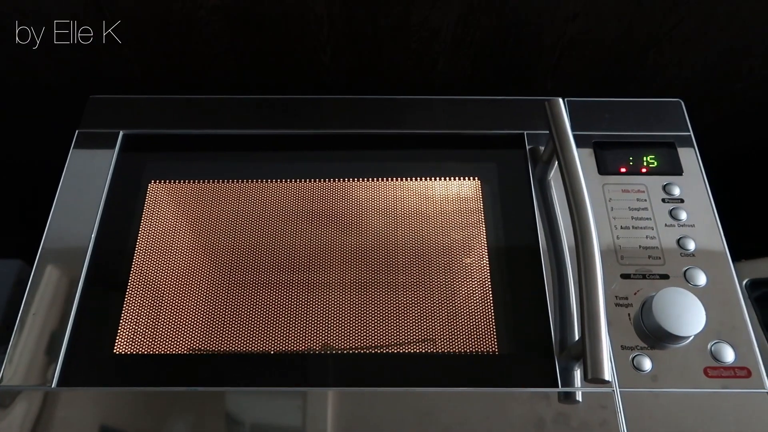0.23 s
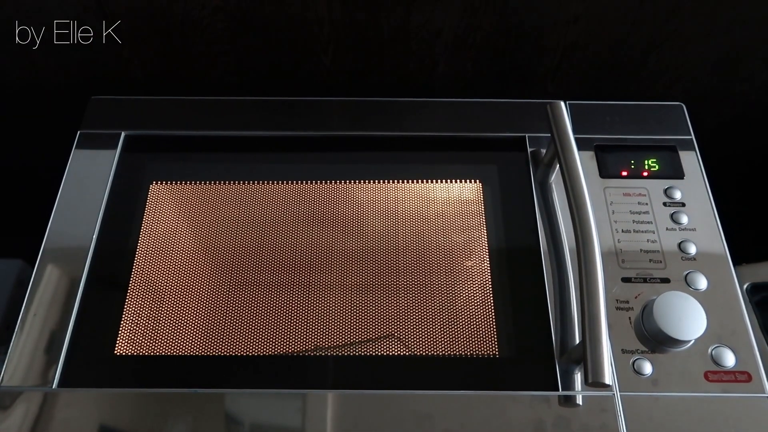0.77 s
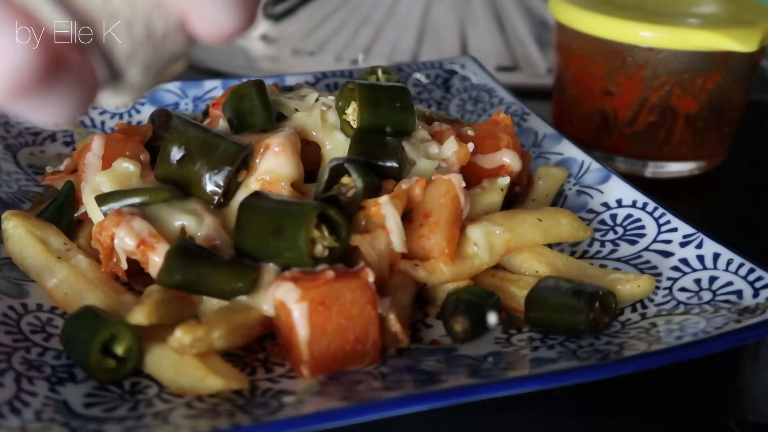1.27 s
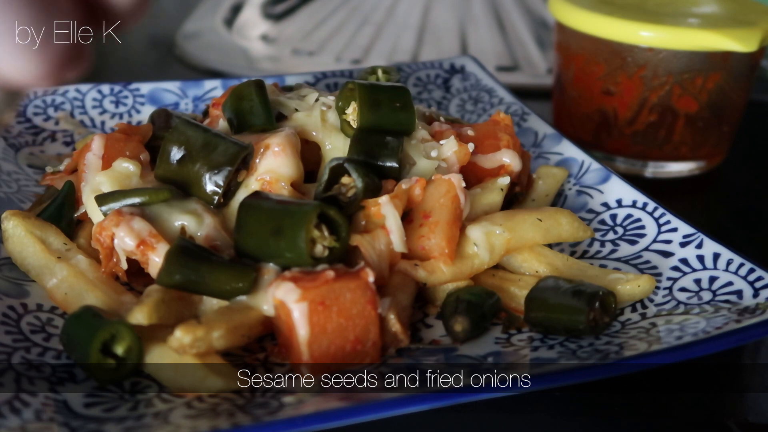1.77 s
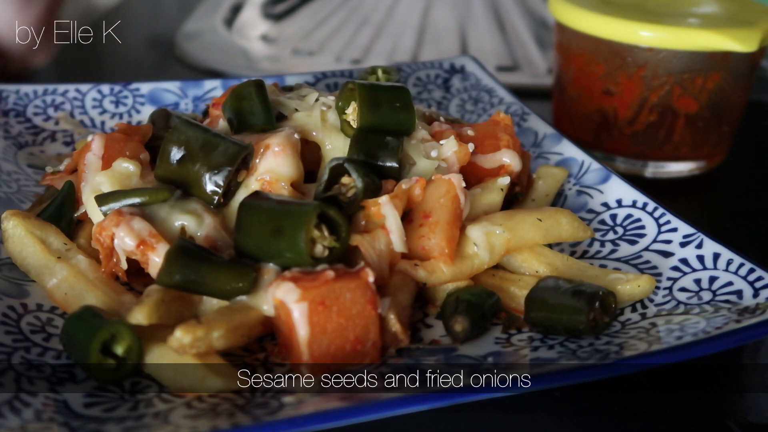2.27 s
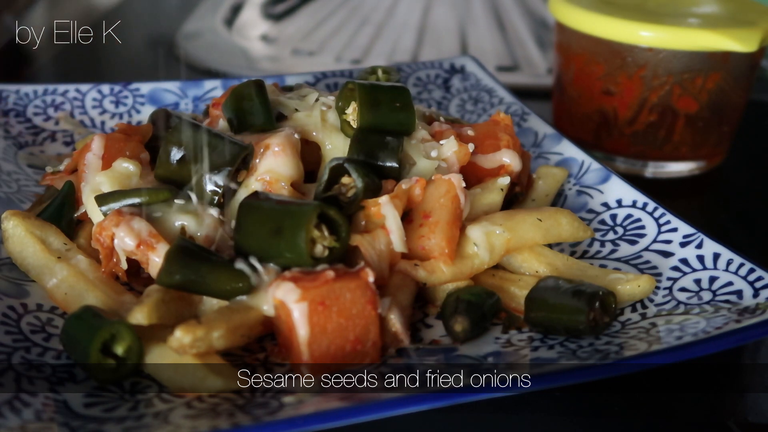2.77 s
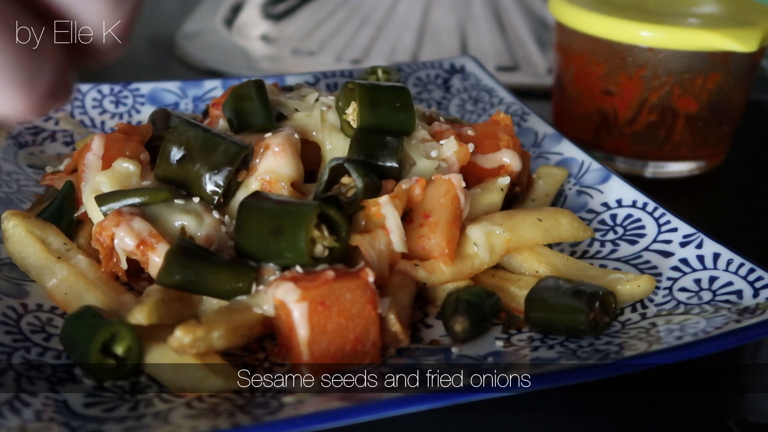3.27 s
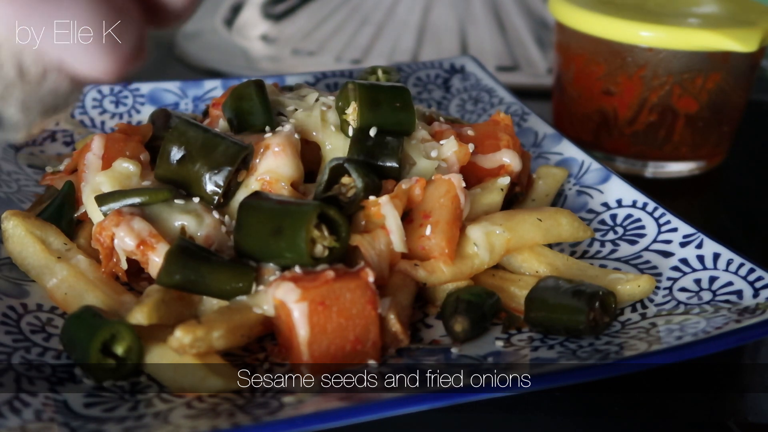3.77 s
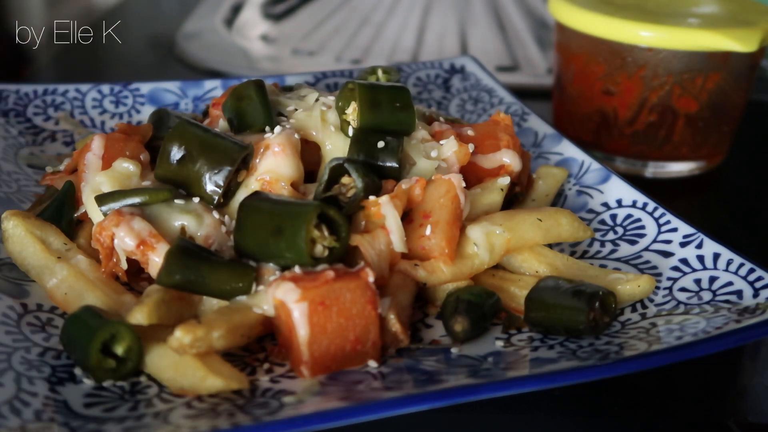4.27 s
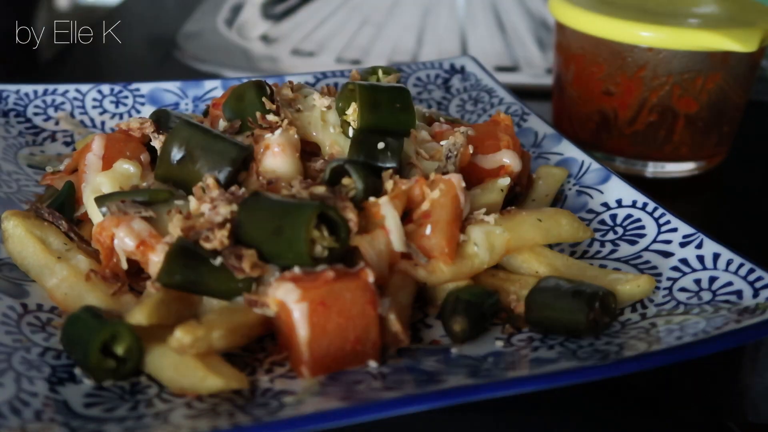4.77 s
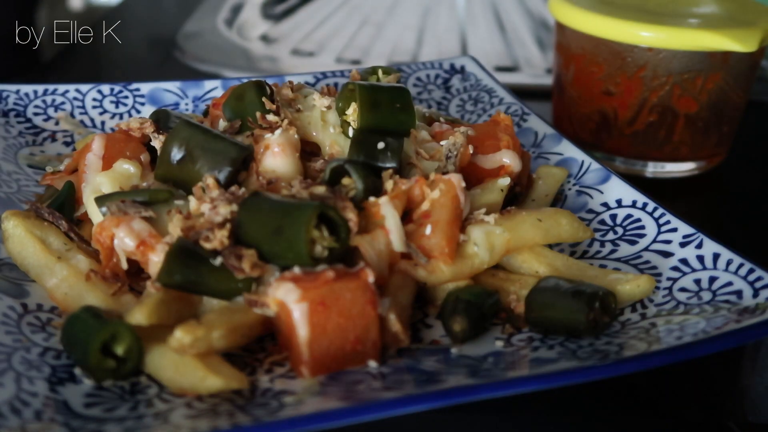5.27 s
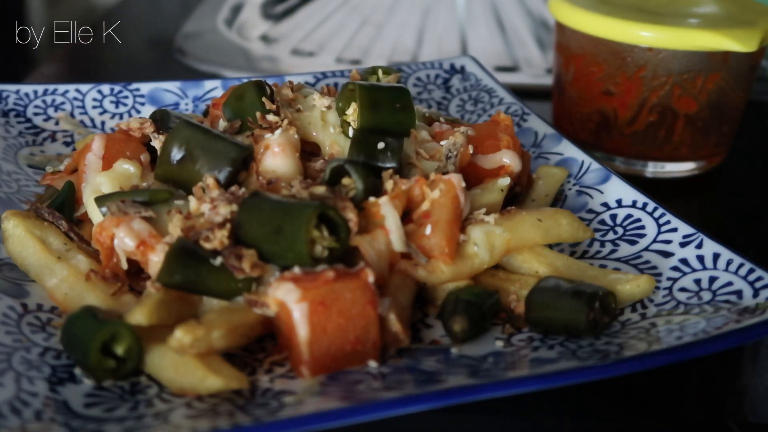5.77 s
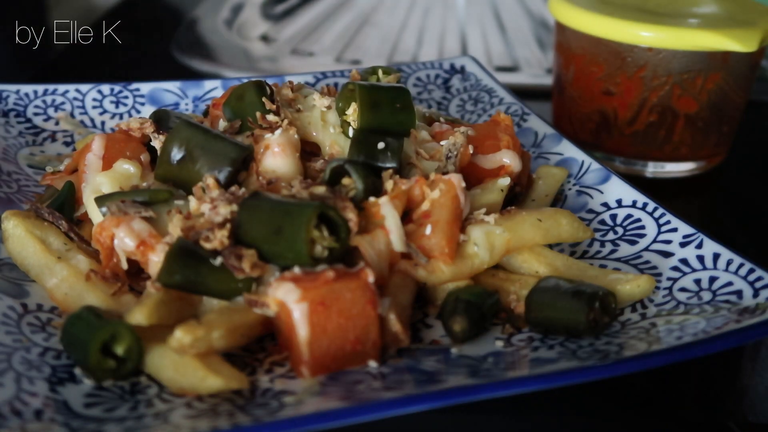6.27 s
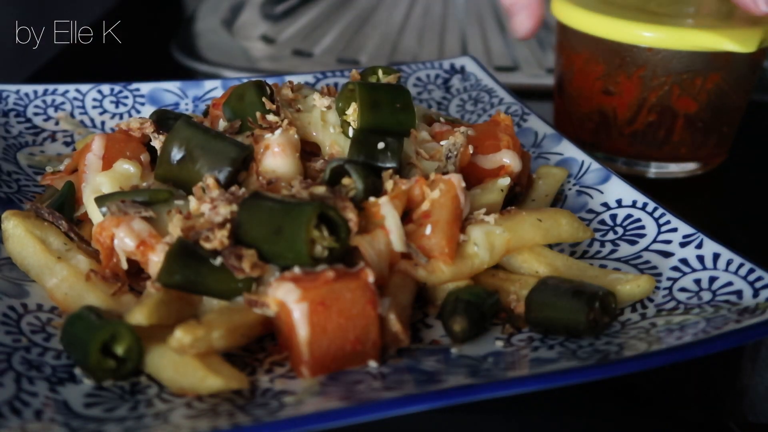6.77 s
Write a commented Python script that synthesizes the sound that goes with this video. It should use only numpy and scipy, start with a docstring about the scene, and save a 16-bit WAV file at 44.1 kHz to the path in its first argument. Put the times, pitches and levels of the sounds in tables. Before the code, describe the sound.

Microwave drone stops dead, faint seeds tick from a tapped jar onto food, a hard tap releases a loud crunchy pour, then rustling and a tiny clink.

```python
"""A microwave oven hums close by and is cut off; then, in the quiet kitchen, a shaker is tapped and seeds
rattle in it and patter on the food. After a tap, a handful of crisp bits pours over a plate in surges, hands
rustle, a tub is knocked and a glass clinks. Hums are sines and airy sounds are shaped noise; seeds and bits are
random clicks ringing resonances; knocks are sets of dying tones."""
import sys
import numpy as np
from scipy import signal
from scipy.fft import rfft, irfft, next_fast_len
from scipy.io import wavfile

SR = 44100
rng = np.random.default_rng(int(sys.argv[2]) if len(sys.argv) > 2 else 0)


def master_out(mix):
    """Clip the mix to full scale and print it as 16-bit PCM to the path in sys.argv[1]."""
    frames = np.transpose(np.atleast_2d(mix))
    ceiling = np.clip(frames, -1, 1)
    pcm = np.round(ceiling * 32767).astype(np.int16)
    wavfile.write(sys.argv[1], SR, pcm)


N = 310023
TIME = np.arange(N) / SR   # seconds
OVEN_STOP_S = 1.1

# The hard tap before the pour. Each row: start in seconds, strength in dB.
TAP_HITS = [(4.7235, -31)]
# Short bursts of crackle: clumps of bits landing, then from 5.95 s rustles of the moving hands.
# Each row: start in seconds, level in dB, time to fade by 60 dB in seconds, ringing pitch in Hz,
# treble in dB against the level.
CRACKLE_BURSTS = [(4.872, -37, 0.08, 1850, -18), (4.884, -31, 0.14, 1900, -6.5),
                  (4.926, -30, 0.1, 2340, -4), (4.942, -28, 0.084, 2470, -4),
                  (4.9847, -18.5, 0.055, 2480, 1), (5.001, -20, .1, 5660, 1.5),
                  (5.016, -18.5, 0.11, 2300, 2.5), (5.173, -34, 0.04, 2870, -6), (5.215, -21, 0.1, 5640, 4),
                  (5.311, -17, 0.085, 5180, 3.5), (5.343, -18, 0.16, 2040, 2),
                  (5.398, -16.5, 0.16, 1295, -8), (5.439, -14.5, 0.075, 1400, -15),
                  (5.508, -16, 0.11, 2970, -1), (5.527, -11.5, 0.072, 2320, -12),
                  (5.582, -20.5, 0.099, 2890, -10), (5.621, -15.5, 0.14, 3010, 0),
                  (5.643, -11.5, 0.069, 937, 0.5), (5.668, -23, .08, 5750, -1), (5.692, -24, .09, 5640, -5),
                  (5.723, -25, 0.089, 2980, -3), (5.76, -28, .08, 2950, -6), (5.956, -50, 0.073, 805, -19),
                  (6.047, -38, 0.2, 1620, -34.5), (6.066, -36, .12, 3100, -30),
                  (6.1, -40.5, .08, 1350, -17), (6.154, -40, 0.099, 1030, -5), (6.269, -48, 0.12, 950, -22),
                  (6.3, -47, .08, 1050, -22), (6.459, -49.5, 0.29, 1750, -25.5),
                  (6.502, -47.5, 0.15, 1740, -28)]
# Hands and bag moving. Each row: time in seconds, level in dB.
HAND_LEVELS = [(5.75, -49.5), (6.03, -44.5), (6.06, -41), (6.215, -43), (6.24, -51), (6.31, -45),
               (6.34, -53), (6.445, -60), (6.47, -49.5), (6.57, -49.5), (6.6, -56), (6.81, -57.5),
               (6.822, -49.5), (6.88, -59.5), (7.03, -56)]


def from_db(db):
    """Turn dB into gain."""
    return 10 ** (np.asarray(db) / 20)


def rms_one(x):
    """Scale to an rms (average strength) of 1."""
    return x / np.sqrt(np.mean(x ** 2) + 1e-20)


def in_time(rows):
    """Draw straight lines between the rows of a level table: one level for each sample."""
    s, level = np.transpose(rows)
    return np.interp(TIME, s, level)


def at_hz(points, hz):
    """Read a table of values against frequency, on a log-frequency axis."""
    table = np.array(points)
    return np.interp(np.log(hz), np.log(table[:, 0]), table[:, 1])


def drift(rate_hz):
    """Slow random wander around zero with rms 1, made at a fortieth of the sample rate."""
    r = np.exp(-2 * np.pi * rate_hz * 40 / SR)
    noise = rng.standard_normal(N // 40 + 2002)
    slow = signal.lfilter([1], [1, -2 * r, r * r], noise)[2000:]   # drop the filter's start-up
    return np.interp(np.arange(N) / 40, np.arange(len(slow)), rms_one(slow))


def fft_grid():
    """A fast transform size and the frequency of each of its bins."""
    size = next_fast_len(N)
    return size, np.maximum(np.arange(size // 2 + 1) * SR / size, 1)


def colour(x, spectrum):
    """Shape each row of x by a spectrum in dB, then scale all to rms 1."""
    size, hz = fft_grid()
    shaped = rfft(x, size) * from_db(at_hz(spectrum, hz))
    return rms_one(irfft(shaped, size)[..., :N])


def spread(mid, side, alike, phase=((100, 0), (200, 0))):
    """Make left and right as alike as the table says at each frequency; the left may lead in phase."""
    size, hz = fft_grid()
    likeness = np.clip(at_hz(alike, hz), 0, 1)
    m = rfft(mid, size) * np.sqrt((1 + likeness) / 2)
    s = rfft(side, size) * np.sqrt((1 - likeness) / 2)
    left = (m + s) * np.exp(1j * at_hz(phase, hz))
    return irfft(np.array([left, m - s]), size)[:, :N]


def resonate(x, peaks):
    """Ring side-by-side resonances of alternating sign, run only while something sounds."""
    out = np.zeros(x.shape)
    busy = np.flatnonzero(np.any(np.atleast_2d(x) != 0, axis=0))
    span = slice(busy[0], busy[-1] + SR // 4)
    for k, (hz, width, db) in enumerate(peaks):
        r = np.exp(-np.pi * max(width, 5) / SR)
        b = [(1 - r * r) / 2, 0, (r * r - 1) / 2]
        a = [1, -2 * r * np.cos(2 * np.pi * hz / SR), r * r]
        out[..., span] += (-1) ** k * from_db(db) * signal.lfilter(b, a, x[..., span] + 1e-18)
    return out


def grains(per_s, uneven_db, channels=1):
    """Random clicks of uneven size and sign, scaled to rms 1."""
    shape = (channels, N)
    size_db = uneven_db * np.minimum(rng.exponential(1, shape), 4)
    sizes = from_db(size_db) * rng.choice([-1, 1], shape)
    return rms_one(sizes * (rng.random(shape) < per_s / SR))


def chips(low_hz, high_hz, per_s, cycles, uneven_db, count, falling):
    """Each grain rings one of many pitches, losing 60 dB in the given cycles; rms 1 while falling."""
    clicks = falling * grains(per_s, uneven_db, channels=2)
    dealt = rng.integers(0, count, N)
    rings = np.zeros((2, N))
    for k, hz in enumerate(np.geomspace(low_hz, high_hz, count)):
        width = np.log(1000) / np.pi * hz / cycles
        rings += resonate(clicks * (dealt == k), [(hz, width, 0)])
    return rms_one(rings) * np.sqrt(np.mean(falling))


def bursts(times, levels_db, t60s, rise_s):
    """Loudness curve of events that rise quickly and die away; overlapping powers add."""
    power = np.zeros(N)
    for s, db, t60 in zip(times, levels_db, t60s):
        i = int(s * SR)
        t = TIME[:min(SR // 2, N - i)]
        fade = from_db(db - 60 * t / max(t60, .005))
        power[i:i + len(t)] += (fade * (1 - np.exp(-t / rise_s))) ** 2
    return np.sqrt(power)


def struck(hits, modes, uneven_db):
    """Each hit sets off every dying tone with a chance strength; the bass below the lowest is cut."""
    at = np.array([round(s * SR) for s, db in hits])
    hit_db = np.array(hits)[:, 1]
    out = np.zeros(N)
    for hz, db, t60 in modes:
        clicks = np.full(N - at[0], 1e-18)
        clicks[at - at[0]] = from_db(hit_db + db + rng.normal(0, uneven_db, len(at)))
        r, w = from_db(-60 / (t60 * SR)), 2 * np.pi * hz / SR
        out[at[0]:] += signal.lfilter([0, np.sin(w)], [1, -2 * r * np.cos(w), r * r], clicks)
    lowest_hz = min(mode[0] for mode in modes)
    return signal.sosfilt(signal.butter(2, .75 * lowest_hz, "high", fs=SR, output="sos"), out)


def oven():
    """Fan noise rings the cabinet, which the transformer shakes twice a mains cycle; the hum wavers."""
    # Fan and cabinet together. Each row: time in seconds, level in dB.
    body_levels = [(0.0, -37), (0.42, -35.5), (0.67, -37), (0.9, -36.5), (1.01, -34.5), (1.09, -36)]
    # Fan noise. Each row: frequency in Hz, relative level in dB per Hz.
    fan_spectrum = [(35, -64), (60, -41), (91, -15), (190, -2.5), (266, -19), (301, -1.5), (390, -3),
                    (435, -13), (488, 3), (542, -13.5), (1170, -5), (1240, -14), (1870, -16), (9000, -53.5),
                    (11700, -83), (19800, -120)]
    # Sheet-metal resonances. Each row: frequency in Hz, width in Hz, relative level in dB.
    cabinet_modes = [(336, 32, -4.5), (486, 130, -8.5), (840, 46, -5.5), (2264, 15, -17.5)]
    # Transformer hum on multiples of the mains, and the fan blades. Each row: pitch in Hz, level in dB rms.
    hum_tones = [(100, -57), (200, -50), (250, -54), (300, -48), (333, -53), (500, -48), (648, -58.5),
                 (748, -58), (1000, -57)]
    # Microphone hiss beside the oven. Each row: frequency in Hz, relative level in dB per Hz.
    hiss_spectrum = [(290, -67), (500, -28), (792, -17), (982, -6.5), (4500, -16), (11100, -30),
                     (15500, -37)]
    cabinet_db, hiss_db, buzz_depth = -4.5, -55, 0.17

    air = rng.standard_normal((2, N))
    cabinet = rms_one(resonate(air[1], cabinet_modes))
    body = colour(air[0], fan_spectrum) + from_db(cabinet_db) * cabinet
    body = rms_one(body * (1 + buzz_depth * np.cos(2 * np.pi * hum_tones[0][0] * TIME)))
    hum = np.zeros(N)
    for hz, db in hum_tones:
        tone = np.sin(2 * np.pi * (hz * TIME + rng.random()))
        hum += np.sqrt(2) * from_db(db + 1.5 * drift(3.5)) * tone
    hiss = from_db(hiss_db) * colour(rng.standard_normal((2, N)), hiss_spectrum)
    return from_db(in_time(body_levels)) * body + hum + hiss


def quiet_floor():
    """Soft steady microphone hiss, unlike left and right above the bass, with low room rumble and a drone."""
    # Hiss and the bass under it. Each row: frequency in Hz, relative level in dB per Hz.
    floor_spectrum = [(35, -43), (60, -12.5), (102, -3), (123, -10.5), (231, -10), (259, -8.5),
                      (351, -10.5), (721, -15.5), (1150, -16.5), (2470, -19), (13500, -37.5), (15500, -54)]
    # Each row: frequency in Hz, left-right likeness from 0 to 1.
    floor_alike = [(60, 0.93), (110, 1), (200, 0.089), (15000, 0)]
    # Distant rumble, then wavering drone. Each row: time in seconds, level in dB.
    rumble_levels = [(1.12, -52), (1.9, -58), (3.9, -58.5), (4.6, -62), (4.8, -53), (5.5, -68), (5.95, -71),
                     (6.3, -64), (7.03, -66)]
    drone_levels = [(1.12, -63), (1.6, -56), (2.2, -72), (4.7, -63), (7.03, -70.5)]
    # One resonance each: frequency in Hz, width in Hz, level in dB.
    rumble_mode = (35, 26, 0)
    drone_mode = (367, 30, 0)
    floor_db = -54

    mid, side = colour(rng.standard_normal((2, N)), floor_spectrum)
    steady = from_db(floor_db) * spread(mid, side, floor_alike)
    far = rng.standard_normal((3, N))
    rumble = rms_one(resonate(resonate(far[0], [rumble_mode]), [rumble_mode]))
    rumble = rumble * from_db(in_time(rumble_levels) + 2.0 * drift(2.4))
    drone = rms_one(resonate(far[1:], [drone_mode]))
    drone = drone * from_db(in_time(drone_levels) + 2.0 * drift(5.6))
    return steady + rumble + drone


def showers():
    """Each shower of seeds swells, holds and thins out, a long one more slowly; powers add."""
    # Each row: start in seconds, level in dB, hold in seconds.
    shower_rows = [(1.173, -68, 0.12), (1.287, -60, 0.037), (1.42, -67, 0.051), (1.72, -66, .02),
                   (1.872, -59, 0.022), (2.02, -64, 0.011), (2.148, -68, .02), (2.305, -67, 0.026),
                   (2.45, -67, 0.025), (2.587, -61, 0.027), (2.712, -60, .01), (2.745, -59.5, .04),
                   (2.797, -58.5, .05), (2.863, -60.5, .04), (2.924, -58, .04), (2.976, -60.5, 0.023),
                   (3.05, -62, .02), (3.09, -61, .015), (3.13, -64, .02), (3.5, -65.5, 0.095),
                   (3.63, -62, 0.037), (3.766, -62.5, 0.026), (3.858, -61, .008), (3.936, -58.5, 0.011),
                   (3.986, -66, 0.017), (4.348, -71, .02)]
    attack_s, t60_s, t60_per_hold = 0.014, 0.09, 2.8

    power = np.zeros(N)
    for s, db, hold in shower_rows:
        t = TIME - s
        fade_db = -60 * np.maximum(t - hold, 0) / (t60_s + t60_per_hold * abs(hold))
        power += (np.clip(t / attack_s, 0, 1) * from_db(db + fade_db)) ** 2
    return np.sqrt(power)


def seeds():
    """Tiny dry ticks patter over the food; a few seeds ring the plate rim."""
    # Seeds on the bare plate rim. Each row: start in seconds, strength in dB.
    rim_hits = [(1.3044, -61), (1.3244, -47.5), (1.4491, -52.5), (1.5948, -61), (2.8679, -56),
                (3.0394, -57), (3.13, -55)]
    # Each row: pitch in Hz, relative level in dB, time to fade by 60 dB in seconds.
    rim_modes = [(1400, -3, 0.054), (2180, -0.5, 0.052), (3230, -3, 0.07), (4400, -4, 0.1), (6040, -4, .03)]

    falling = (TIME > OVEN_STOP_S) & (TIME < TAP_HITS[0][0])
    ticks = chips(2400, 14600, 6000, 22.0, 2.2, count=14, falling=falling)
    # frequency in Hz, width in Hz, level in dB
    ticks = resonate(ticks, [(2880, 1700, 7), (5800, 1200, 14), (12200, 3500, -4.5)])
    patter = spread(*rms_one(ticks), [(4000, 0.33), (14000, 0.1)])
    level = showers() * from_db(2.0 * drift(39))
    return level * patter + struck(rim_hits, rim_modes, uneven_db=0.0)


def shaker():
    """Each jolt throws seeds against the jar wall: a short cluster of clicks in its resonances."""
    # Jolts of the shaker. Each row: start in seconds, rattle level in dB, dull knock level in dB.
    jolts = [(1.28, -50, -63), (1.431, -48, -62), (1.4496, -53, -65), (1.724, -45.5, -58),
             (1.7322, -51, -50.5), (1.87, -43, -51), (1.8836, -41, -49), (1.9704, -54, -60),
             (2.006, -48, -65), (2.027, -46, -62), (2.168, -38.5, -50), (2.271, -52, -51),
             (2.2962, -42, -54), (2.313, -41.5, -52), (2.4485, -41.5, -61), (2.461, -46, -52.5),
             (2.552, -43, -43.5), (2.591, -40, -52), (2.6019, -45, -57), (2.716, -54, -61),
             (2.742, -44, -57), (2.753, -47, -55), (2.819, -48.5, -55), (2.8689, -53, -62),
             (2.881, -42.5, -54), (2.893, -45.5, -50), (2.9422, -50, -57), (2.954, -50, -60),
             (3.276, -53, -63), (3.341, -48, -55), (3.3565, -50.5, -60), (3.4938, -47, -59),
             (3.5056, -44.5, -54), (3.569, -49, -62), (3.606, -50, -55), (3.638, -41.5, -50),
             (3.652, -40.5, -48.5), (3.8214, -53.5, -67), (3.9995, -52, -58)]
    # Bright, then dull jar resonances. Each row: frequency in Hz, width in Hz, relative level in dB.
    jar_bright = [(2100, 300, -1), (2454, 350, 7), (2730, 364, 8.5), (3210, 350, 1), (4270, 500, -18)]
    jar_dull = [(987, 100, 3), (1550, 350, 1.5)]
    # Dry click of the wall. Each row: pitch in Hz, relative level in dB, time to fade by 60 dB in seconds.
    wall_modes = [(1450, 0.5, .012), (2090, 0, .01), (2780, -0.5, .008), (3400, -8, .008)]
    wall_db = 3   # against the dull knock
    rebound_within_s, jolt_t60_s, rebound_t60_s = .022, 0.054, 0.076
    left_db = 1.5   # the shaker is held a little to the left

    s, rattle_db, knock_db = np.transpose(jolts)
    # seeds thrown back soon after a jolt rattle longer
    t60 = np.where(np.diff(s, prepend=0) < rebound_within_s, rebound_t60_s, jolt_t60_s)
    clicks = grains(2800, 3.0)[0]
    clicks[(s * SR).astype(int) + 40] = 4.3   # a seed always lands just under 1 ms into the jolt
    high = rms_one(resonate(clicks, jar_bright)) * bursts(s, rattle_db, t60, 0.00051)
    low = rms_one(resonate(clicks, jar_dull)) * bursts(s, knock_db, t60, 0.0011)
    wall = struck(list(zip(s + 0.000794, knock_db + wall_db)), wall_modes, uneven_db=2.0)
    return (high + low + wall) * from_db([[left_db / 2], [-left_db / 2]])


def tap():
    """A hard tap: dying tones, a very short crack of noise and a rattling tail."""
    # Each row: pitch in Hz, relative level in dB, time to fade by 60 dB in seconds.
    tap_modes = [(995, 4, 0.059), (1010, -8, 0.3), (1080, -4, 0.07), (1850, 2, 0.051), (2400, -5, .07),
                 (2510, -3.5, 0.096), (2880, 2, 0.012), (4300, 0.5, 0.0079)]
    start_s = TAP_HITS[0][0]

    crack = rng.standard_normal(N) * bursts([start_s], [-40], [.02], 0.00018)
    # frequency in Hz, width in Hz, level in dB
    tail = resonate(rng.standard_normal(N), [(1800, 400, 12), (2500, 400, 17), (4860, 2600, -5)])
    rattle = tail * bursts([start_s], [-37], [.14], 0.00031)
    return struck(TAP_HITS, tap_modes, uneven_db=1.2) + crack + rattle


def thuds():
    """Small slips of the hand ring the hollow container; soft bumps swell and die, each at its own pitch."""
    # The container creaks in the hand. Each row: time in seconds, level in dB.
    creak_levels = [(4.79, -62), (4.82, -45.5), (5.3, -46.5), (5.44, -35.5), (5.8, -41), (6.2, -46),
                    (6.3, -57), (6.42, -78.5)]
    # Hollow container. Each row: frequency in Hz, width in Hz, relative level in dB.
    hollow_modes = [(127.4, 31, -1.5), (168, 41, -7), (274.4, 70, -1.5)]
    # Low bumps. Each row: start in seconds, level in dB, pitch in Hz, time to fade by 60 dB in seconds.
    bump_rows = [(5.527, -17.5, 293, 0.21), (5.853, -31, 260, 0.18), (5.909, -30, 240, 0.19),
                 (5.972, -29.5, 170, .12), (6.002, -22, 106, 0.2), (6.05, -27.5, 190, 0.13),
                 (6.085, -29, 110, .15), (6.085, -34.5, 56, 0.29), (6.748, -35.5, 200, .12),
                 (6.776, -39, 190, .08)]
    rise_s = 0.0061

    creaks = rms_one(resonate(grains(1500, 1.8, channels=2), hollow_modes))
    out = spread(*creaks, [(110, 1.0), (300, 0.96)])
    out = out * from_db(in_time(creak_levels)) * (TIME > creak_levels[0][0])
    for s, db, hz, t60 in bump_rows:
        wobble = 1 + 0.46 * drift(25)
        angle = 2 * np.pi * (hz * TIME + rng.random()) + 0.92 * drift(29)
        out += bursts([s], [db], [t60], rise_s) * wobble * np.sin(angle)
    return signal.sosfilt(signal.butter(2, 45.0, "high", fs=SR, output="sos"), out)


def crackle_rings():
    """Each burst of crackle rings at a pitch of its own while it dies away."""
    ring_db = 5.5   # against the burst level
    out, crackle = np.zeros(N), grains(5000, 7.5)[0]
    for s, level_db, t60, hz, treble_db in CRACKLE_BURSTS:
        i = int(s * SR)
        span = slice(i, i + SR // 4)
        fade_db = -60 * TIME[:SR // 4] / max(t60, .01)
        burst = crackle[span] * from_db(level_db + ring_db + fade_db)
        # narrow rings pass less of the crackle, so low ones are raised
        out[span] += resonate(burst, [(hz, 0.031 * hz, 0)]) * np.sqrt(SR / hz)
    return out


def dish(flow, falling):
    """The falling bits ring the dish: where one lands decides which resonance it strikes."""
    # Each row: frequency in Hz, width in Hz, relative level in dB.
    dish_modes = [(481, 16.4, 1), (766, 35, 3.5), (1400, 40, 3), (1703, 10, 5.5), (2042, 30, 4.5),
                  (2276, 30, 5), (2440, 39, -11), (2820, 54, 5), (2945, 30, 3), (4125, 87, 3),
                  (5210, 24, 5), (5530, 98, -2), (5750, 60, -2), (10260, 70, -5)]
    pour_end_s = 5.815

    blows = grains(2500, 3.3, channels=2)
    spot = rng.integers(0, len(dish_modes), N)
    on_dish = falling * flow * np.clip((pour_end_s - TIME) / 0.05, 0, 1)
    rings, power = np.zeros((2, N)), 0
    for k, (hz, width, db) in enumerate(dish_modes):
        rings += resonate(blows * on_dish * (spot == k), [(hz, width, db)])
        power += np.pi * width / SR * from_db(2 * db)
    return rings / np.sqrt(power / len(dish_modes))   # level set by the expected power


def pour():
    """Dense crisp grains in surges click, ring by themselves and ring the dish; hands then rustle the last."""
    # The stream of crisp bits. Each row: time in seconds, level in dB.
    stream_levels = [(4.83, -81), (4.91, -38.5), (4.98, -35.5), (5.02, -28), (5.04, -29.5), (5.085, -35),
                     (5.125, -31.5), (5.16, -36), (5.19, -37), (5.21, -44.5), (5.23, -28.5), (5.29, -31),
                     (5.35, -22.5), (5.46, -24), (5.54, -24), (5.575, -28), (5.63, -24.5), (5.7, -25.5),
                     (5.775, -28.5), (5.81, -37), (5.97, -49), (6.05, -79)]
    # Main sound of the bits, then their treble. Each row: frequency in Hz, relative level in dB per Hz.
    main_spectrum = [(210, -75), (350, -9.5), (629, -13.5), (931, 2.5), (1120, 1.5), (2870, 3.5),
                     (4620, -8.5), (5610, -12), (6500, -20), (8450, -20), (14300, -120)]
    treble_spectrum = [(2940, -22), (5000, -7.5), (5630, -6), (7550, -11), (10300, -7.5), (13600, -11),
                       (15500, -46)]
    # Big pieces strike the dish. Each row: start in seconds, strength in dB.
    big_hits = [(5.2205, -16), (5.351, -12), (5.533, -5), (5.626, -10), (5.65, -6)]
    # Each row: pitch in Hz, relative level in dB, time to fade by 60 dB in seconds.
    big_modes = [(950, -14, 0.022), (1880, -6.5, .012), (2920, -9, .01), (5300, -12, .006)]
    # Each row: frequency in Hz, left-right likeness from 0 to 1.
    bits_alike = [(500, 0.98), (2000, 0.98), (4000, 0.78), (8000, 0.36), (14000, 0.68)]
    # Each row: frequency in Hz, how far the left leads in radians.
    left_lead = [(2600, 0), (4000, -.25), (5600, -1), (7700, -1.3), (8500, -2), (12000, -3), (15300, -3)]
    stray_db = -8   # bits shed by the moving hands, against the rustle
    full_flow_db, full_treble_db, treble_per_db = -24, -2, .5
    grains_per_s, ring_cycles, ring_db, dish_db = 4000, 260, -3.5, -3
    left_db = -.5   # the bits fall a little to the right

    s, level_db, t60, hz, treble_db = np.transpose(CRACKLE_BURSTS)
    falling = TIME > stream_levels[0][0]
    stray = (TIME > HAND_LEVELS[0][0]) * from_db(in_time(HAND_LEVELS) + stray_db)
    stream = np.hypot(from_db(in_time(stream_levels)), stray)
    # a thinner stream is duller
    brightness = from_db(full_treble_db) * (stream / from_db(full_flow_db)) ** treble_per_db
    stream = falling * stream * from_db(1.76 * drift(17.4))
    flow = np.hypot(stream, bursts(s, level_db, t60, 0.0019))
    crisp = np.hypot(stream * brightness, bursts(s, level_db + treble_db, t60, 0.0051))

    crumbs = chips(505.7, 14256, 1500, ring_cycles, 4.1, count=40, falling=falling)
    hits = falling * grains(grains_per_s, 2.04, channels=2) + from_db(ring_db) * crumbs
    body = flow * colour(hits, main_spectrum) + crisp * colour(hits, treble_spectrum)
    body = np.sqrt(np.mean(falling)) * body   # undo the boost that the silent start gives to rms 1
    extra = crackle_rings() + struck(big_hits, big_modes, uneven_db=2.5)
    mid, side = body + from_db(dish_db) * dish(flow, falling)
    both = spread(mid + extra, side, bits_alike, left_lead)
    return both * from_db([[left_db / 2], [-left_db / 2]])


def rustle():
    """Soft, dull crackle of moving hands: shaped random clicks."""
    # Each row: frequency in Hz, relative level in dB per Hz.
    rustle_spectrum = [(150, -23), (250, -10), (329, -8), (498, -5), (681, -9), (980, -7), (1680, -8.5),
                       (5000, -26), (6500, -33), (11000, -120)]

    crackle = colour(grains(3000, 2.4, channels=2), rustle_spectrum)
    both = spread(*crackle, [(300, 1.0), (2000, 0.94), (5000, 0.53)])
    level = from_db(in_time(HAND_LEVELS) + 1.9 * drift(28))
    return (TIME > HAND_LEVELS[0][0]) * level * both


def tub_knocks():
    """Fingers knock softly on the tub and set off its low dying tones."""
    # Each row: start in seconds, strength in dB.
    finger_hits = [(6.8215, -36), (6.8355, -37), (6.849, -47), (6.8585, -48)]
    # Each row: pitch in Hz, relative level in dB, time to fade by 60 dB in seconds.
    tub_modes = [(236, -7, 0.068), (293, -4, 0.18), (364, -4, 0.27), (407, -2, 0.14), (517, -6.5, 0.049),
                 (1180, -10, .04), (1870, -9, 0.043)]
    return struck(finger_hits, tub_modes, uneven_db=0.5)


def glass_clink():
    """A touched glass rings with high, longer-lasting tones."""
    # Each row: start in seconds, strength in dB.
    glass_hits = [(7.003, -52), (7.0098, -45.5)]
    # Each row: pitch in Hz, relative level in dB, time to fade by 60 dB in seconds.
    glass_modes = [(2510, -20, 0.092), (3710, -8, .3), (5115, 0, .4), (6260, -14, .2)]
    return struck(glass_hits, glass_modes, uneven_db=2.0)


def scene():
    """The oven sound gives way within 5 ms to the quiet kitchen and all that is done there."""
    later = np.clip((TIME - OVEN_STOP_S) / 0.0049 + 1, 0, 1)
    food = quiet_floor() + seeds() + shaker() + tap() + thuds() + pour()
    food = food + rustle() + tub_knocks() + glass_clink()
    return (1 - later) * oven() + later * food


def record(dry):
    """The highest peaks are rounded, and the top is cut steeply."""
    rounded = 1.28 * np.tanh(dry / 1.32)
    cutoff_hz = 15950   # 70 dB down from here up
    return signal.sosfilt(signal.cheby2(16, 70, cutoff_hz, fs=SR, output="sos"), rounded)


dry = scene()
out = record(dry)
master_out(out)
```